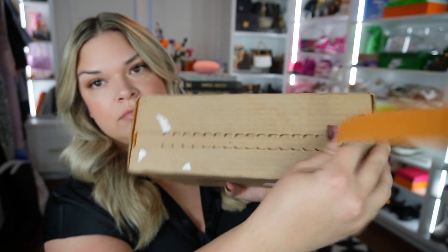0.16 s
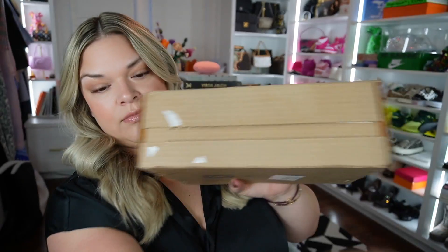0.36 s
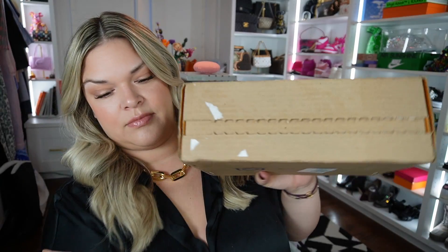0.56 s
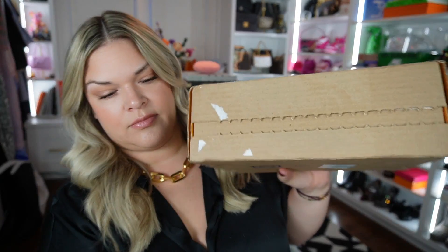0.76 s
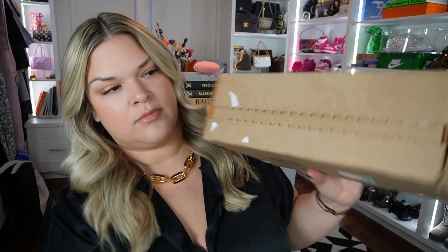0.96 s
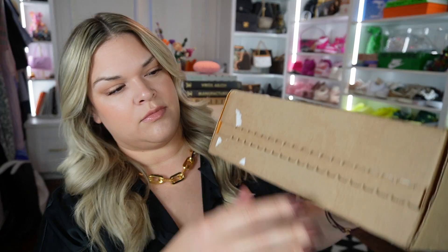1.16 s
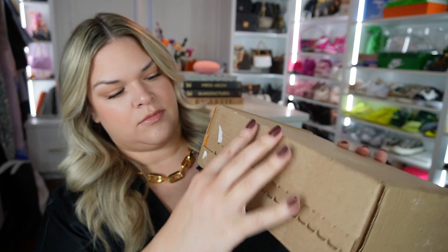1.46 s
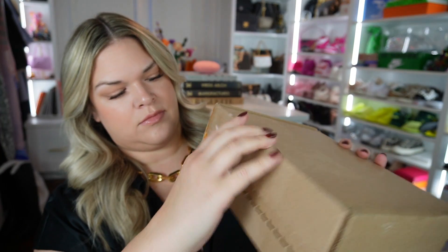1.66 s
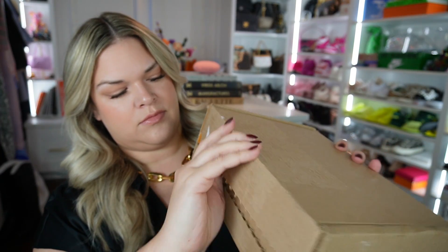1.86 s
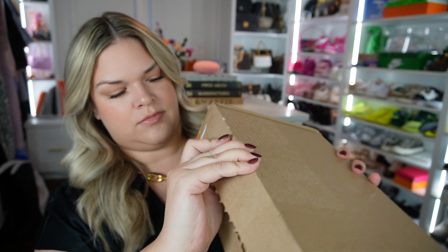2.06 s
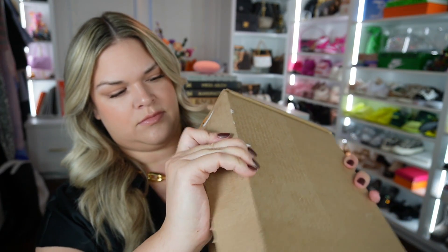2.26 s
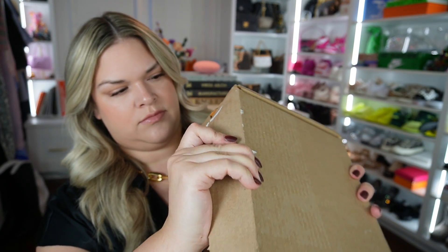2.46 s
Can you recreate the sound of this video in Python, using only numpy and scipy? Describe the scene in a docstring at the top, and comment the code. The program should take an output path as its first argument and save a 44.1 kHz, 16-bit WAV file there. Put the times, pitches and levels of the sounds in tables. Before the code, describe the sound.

A cardboard box's stuck strip rips off in a sharp burst, then fingers handle the flaps

```python
"""A cardboard box handled close to a microphone in a small soft room, over a faint mains hum and room air.
After two light knocks a stuck strip is ripped off in a loud burst of hiss, snaps and hollow knocks; small crackles
follow, then fingers slide, grip and pry at the flaps, with louder snaps and a knock near the end.
Rubbing and scuffs are grainy noise, snaps are noise bursts with a spike, knocks are rough pushes through box modes.
"""
import sys
import numpy as np
from scipy import signal
from scipy.fft import rfft, irfft, next_fast_len
from scipy.io import wavfile
from scipy.ndimage import uniform_filter1d, map_coordinates

SR = 44100
rng = np.random.default_rng(int(sys.argv[2]) if len(sys.argv) > 2 else 0)


def transcribe(u):
    """Save the signal u as a 16-bit wav file named by the first command-line argument.

    u: samples, shape (n,) or (channels, n), limited to [-1, 1]; the rate is SR.
    q: integer samples, one column per channel.
    """
    v = np.clip(np.atleast_2d(u).T, -1, 1)
    q = np.round(v * 32767).astype(np.int16)
    wavfile.write(sys.argv[1], SR, q)


N = 114660  # samples, 2.6 s


def amp(db):
    """Decibels to linear amplitude."""
    return 10 ** (np.asarray(db) / 20)


def unit(x):
    """Scale a signal to an rms of one."""
    return x / np.sqrt(np.mean(x ** 2) + 1e-20)


def along(points, hz):
    """Read a curve of (Hz, value) points on a log frequency axis."""
    f, v = np.transpose(points)
    return np.interp(np.log(hz + 1), np.log(f + 1), v)


def filtered(x, response):
    """Multiply the spectrum of x by a complex response of frequency."""
    m = next_fast_len(len(x) + 8192)  # room for the ringing
    spectrum = rfft(x, m) * response(np.fft.rfftfreq(m, 1 / SR))
    return irfft(spectrum, m)[:len(x)]


def wobble(rate):
    """A smooth random curve with rate knots a second."""
    knots = rng.standard_normal(int(N * rate / SR) + 4)
    return map_coordinates(knots, [np.arange(N) * rate / SR])


def broad(f, hz, width):
    """One wide causal resonance; width is its bandwidth as a share of the centre."""
    w = hz * max(width, .1)
    return 1j * f * w / (hz * hz - f * f + 1j * f * w)


def box(f, turn):
    """Causal modes of the hollow box: turn near -1 alternates their signs, near 1 starts them together."""
    # The hollow resonances of the box. Each row: centre in Hz, width in Hz, relative level in dB.
    modes = [(136, 37, -4.5), (228, 60, -1.5), (297, 77, 1), (355.4, 36, 4.5), (456, 69.6, 1.5),
             (628, 150, -2), (828, 110, -0.5), (1031, 110, -1.5), (1380, 280, -5), (1860, 360, -6.5),
             (2430, 700, -12)]
    response = 0
    for k, (centre, width, db) in enumerate(modes):
        mode = 1j * f * width / (centre * centre - f * f + 1j * f * width)
        response = response + turn ** k * amp(db) * mode
    return response


def friction():
    """Sliding fibres: steady noise mixed with tiny ticks of uneven size."""
    grains_per_s, grain_share = 2000, 0.4  # share of the power
    ticks = rng.exponential(size=N) * (rng.random(N) < grains_per_s / SR)
    envelope = np.sqrt(signal.lfilter([1], [1, -.9], ticks ** 2))  # each tick dies within samples
    grains = envelope * rng.standard_normal(N)
    smooth = rng.standard_normal(N)
    return np.sqrt(grain_share) * unit(grains) + np.sqrt(1 - grain_share) * smooth


def patchy(x):
    """Random gain patches over time and frequency: each bit of surface sounds a little different."""
    patch_db = 2.5  # rms
    z = signal.stft(x, nperseg=256)[2]
    field = uniform_filter1d(rng.standard_normal(z.shape), size=12, axis=0)
    field = uniform_filter1d(field, size=8, axis=1)
    return signal.istft(z * amp(patch_db * unit(field)), nperseg=256)[1][:N]


def background():
    """Room air is coloured noise; mains hum is a sine of slowly wandering level."""
    # The mains hum. Each row: frequency in Hz, mean level in dB rms.
    hum_tones = [(120, -70)]
    # The colour of the room air. Each row: frequency in Hz, relative level in dB.
    air_colour = [(25, -6), (80, -3), (160, -9), (260, -3), (500, -13.5), (1070, -17.5), (4000, -29),
                  (16000, -30.5)]
    air_db = -73.5  # rms
    t = np.arange(N) / SR
    hum = np.zeros(N)
    for hz, db in hum_tones:
        hum += np.sqrt(2) * amp(db + 0.99 * wobble(5)) * np.sin(2 * np.pi * hz * t)
    air = unit(filtered(rng.standard_normal(N), lambda f: amp(along(air_colour, f))))
    return hum + amp(air_db) * air


def room(x):
    """Soft walls answer with noise in which each frequency dies at its own speed."""
    # How long the room rings. Each row: frequency in Hz, t60 in seconds.
    decay = [(200, 0.14), (1500, 0.24), (12000, 0.32)]
    hz, t, z = signal.stft(rng.standard_normal(SR // 2), SR, nperseg=256)
    fade = amp(-60 * t / along(decay, hz)[:, None])
    tail = signal.istft(z * fade, SR, nperseg=256)[1]
    delayed = np.pad(x, (200, 0))  # samples before the answer
    return signal.fftconvolve(delayed, tail / np.linalg.norm(tail))[:N]


def scuffs():
    """Fingers scuff over the corrugation: resonant friction swells, flutters roughly and fades."""
    # The scuffs. Each row: start in seconds, time from start to fade in seconds, level in dB rms before the
    # flutter, centre in Hz, resonance width as a share of the centre, swell in seconds.
    scuff_list = [(0.17, .04, -51, 993, 0.44, 0.0062), (0.955, 0.075, -54.5, 835, 0.72, 0.0024),
                  (1.549, 0.11, -61, 1020, 0.23, 0.01), (1.687, 0.05, -53.5, 1037, 0.19, 0.02),
                  (1.784, 0.062, -52.5, 1060, 0.12, 0.0033), (1.94, 0.2, -59.5, 2090, 0.64, 0.028),
                  (2.411, .17, -48, 1480, 1.47, 0.16)]
    fade_s = 0.02  # time constant
    out, t = np.zeros(N), np.arange(N) / SR
    for start, length, db, hz, width, swell in scuff_list:
        rise = np.clip((t - start) / swell, 0, 1)
        fade = np.exp(-np.clip(t - start - length, 0, 1) / fade_s)
        # a weak second resonance sits an octave above
        band = unit(filtered(friction(), lambda f: broad(f, hz, width) ** 2 + 0.13 * broad(f, 2 * hz, 0.65)))
        out += amp(db + 3.9 * wobble(70)) * rise * fade * band
    return out


def rubbing():
    """Sliding and peeling contact hisses on the paper surface and drives the box into a rumble."""
    # The course of the rubbing. Each row: time in seconds, hiss level and box rumble level in dB rms
    # before their wobble.
    course = [(0.017, -43.5, -112), (0.044, -55, -53.5), (0.111, -59, -70), (0.169, -51, -54.5),
              (0.19, -37.5, -46.5), (0.209, -50, -40), (0.222, -40, -29.5), (0.231, -20, -22),
              (0.238, -33, -33), (0.248, -26.5, -26.5), (0.263, -39.5, -33.5), (0.285, -44, -43.5),
              (0.33, -54.5, -44.5), (0.369, -64.5, -59.5), (0.43, -59.5, -62), (0.486, -63, -61),
              (0.52, -54, -63), (0.56, -62, -60.5), (0.66, -66.5, -63.5), (0.76, -69.5, -73),
              (0.849, -58.5, -62.5), (0.98, -63, -69), (1.0, -54, -64), (1.09, -72.5, -58.5),
              (1.2, -85, -76), (1.35, -82.5, -70), (1.413, -76, -62), (1.422, -56, -63), (1.45, -57, -59),
              (1.465, -69, -64), (1.505, -65.5, -65.5), (1.517, -58.5, -64.5), (1.674, -60, -58.5),
              (1.712, -44.5, -44), (1.741, -61, -65), (1.779, -68, -65), (1.79, -54.5, -47),
              (1.87, -66, -52.5), (1.91, -59.5, -60), (2.03, -55, -58), (2.15, -57.5, -55.5),
              (2.24, -51.5, -52.5), (2.38, -66, -55.5), (2.5, -50.5, -51.5), (2.6, -49.5, -53)]
    # The colour of the paper hiss. Each row: frequency in Hz, relative level in dB per Hz.
    paper_colour = [(800, -40), (1500, -5.5), (2140, -7.5), (3410, -5.5), (5070, -7), (8570, -2),
                    (10300, -11.5), (13400, -14.5), (16000, -19)]
    s, hiss_db, rumble_db = np.transpose(course)
    t = np.arange(N) / SR
    hiss = unit(filtered(patchy(friction()), lambda f: amp(along(paper_colour, f))))
    rumble = unit(filtered(friction(), lambda f: box(f, -0.99)))
    hiss_gain = amp(np.interp(t, s, hiss_db) + 1.5 * wobble(60))
    rumble_gain = amp(np.interp(t, s, rumble_db) + 0.32 * wobble(33))
    touching = t > s[0]
    return touching * (hiss * hiss_gain + rumble * rumble_gain)


def knocks():
    """A short rough push rings the box modes near its centre and jolts the whole box."""
    # Knocks into the box walls. Each row: start in seconds, peak of the ring in dB, centre of the excited
    # modes in Hz, contact time constant in seconds, jolt of the whole box in dB relative to the ring peak.
    knock_list = [(0.017, -34, 360, 0.0026, -6.5), (0.026, -30.5, 370, 0.0047, -12),
                  (0.2095, -15, 488, 0.00067, -21), (0.2149, -10, 264, 0.0044, -23),
                  (0.23, -20, 382, 0.0016, -14), (0.2471, -16, 320, 0.0021, -29),
                  (0.267, -30, 231, 0.0031, -30), (0.311, -28.5, 490, 0.0035, -18),
                  (0.9546, -39.5, 770, 0.0086, -12.5), (1.004, -39.5, 790, 0.0055, -28),
                  (1.053, -46.5, 348, 0.0026, -12.5), (1.3789, -41.5, 341, 0.0037, -20),
                  (1.4144, -42, 353, 0.004, -27), (1.7117, -31, 398, 0.0036, -12),
                  (1.784, -40, 356, 0.0018, -35), (1.995, -50.5, 237, 0.029, -7),
                  (2.159, -31, 880, 0.0075, -27), (2.224, -43, 293, 0.0042, -27),
                  (2.299, -19.5, 766, 0.0099, -15.5), (2.304, -25, 484, 0.005, -23.5),
                  (2.542, -32.5, 350, 0.0017, -37)]
    press_s = .002  # the wall yields this long before the blow
    blow_db = 7.5  # boost of the first blow over the rough contact
    thud_hz, thud_t60 = 115, 0.031  # Hz, s
    width = 0.98  # share of the centre
    out, t = np.zeros(N + SR), np.arange(SR // 5) / SR
    for start, db, hz, contact, thud_db in knock_list:
        envelope = np.minimum(t / press_s, 1) ** 2 * np.exp(-t / max(contact, .0003))
        push = rng.standard_normal(len(t)) * envelope
        push[round(press_s * SR)] = amp(blow_db) * np.sqrt(contact * SR / 20)  # longer contact, bigger blow
        ring = filtered(push, lambda f: box(f, 0.98) * broad(f, hz, width) / (1 + 1j * f / (2 * hz)))
        thud = amp(thud_db - 60 * t / thud_t60) * np.sin(2 * np.pi * thud_hz * t)
        out[round(start * SR):][:len(t)] += amp(db) * (ring / np.abs(ring).max() + thud)
    return out[:N]


def snaps():
    """Fibre or glue swells under strain, breaks with a spike and dies as crackle in milliseconds."""
    # Snaps of fibre and glue. Each row: start in seconds, peak in dB, centre in Hz, decay t60 in seconds.
    snap_list = [(0.0307, -12.5, 3407, 0.0052), (0.1491, -37, 3745, 0.0066), (0.1703, -28.5, 4200, 0.01),
                 (0.1945, -25.5, 3733, 0.015), (0.2021, -19, 8320, 0.012), (0.2093, -8.5, 3890, 0.025),
                 (0.2303, -8, 2735, 0.012), (0.2478, -10, 7000, 0.014), (0.2559, -25.5, 7910, 0.012),
                 (0.2636, -20.5, 8120, 0.0087), (0.2905, -29, 7820, 0.011), (0.3136, -33.5, 2795, 0.019),
                 (0.414, -37.5, 5900, 0.011), (0.4398, -37, 5200, 0.014), (0.4613, -37.5, 5140, 0.0097),
                 (0.5144, -39, 5160, 0.016), (0.6291, -41, 3660, 0.021), (0.8325, -35.5, 5300, 0.018),
                 (0.85, -39, 7100, 0.046), (0.9877, -38.5, 5470, 0.018), (0.9955, -37, 7350, 0.018),
                 (1.031, -47.5, 6880, 0.015), (1.0694, -46.5, 7740, 0.016), (1.482, -51, 2640, 0.018),
                 (1.5092, -38.5, 7500, 0.01), (1.645, -34.5, 12500, 0.014), (1.7045, -35, 5100, 0.012),
                 (1.7123, -32.5, 12300, 0.016), (1.8084, -41, 4430, 0.023), (1.9937, -36, 7780, 0.014),
                 (2.1028, -33, 8900, 0.014), (2.1322, -38.5, 7980, 0.01), (2.1609, -22, 5760, 0.014),
                 (2.241, -34, 7700, 0.01), (2.2686, -31.5, 7300, 0.01), (2.2768, -33, 4500, 0.014),
                 (2.2993, -15.5, 6500, 0.02), (2.3025, -23.5, 8110, 0.04), (2.4184, -46, 11000, 0.01),
                 (2.516, -33, 8360, 0.017), (2.5454, -24, 2593, 0.023)]
    build_s = .0012  # swell before the break
    break_db = 12.5  # the single spike of the break over the crackle
    base_width, wider_db_per_db = 1.1, 0.53  # share of the centre at -27 dB; louder snaps are wider
    treble_hz = 10500  # treble roll-off
    out, t = np.zeros(N + SR), np.arange(SR // 10) / SR
    for start, db, hz, t60 in snap_list:
        swell = .3 * (t / build_s) ** 2
        crackle = amp(-60 * (t - build_s) / max(t60, .002))
        force = rng.standard_normal(len(t)) * np.where(t < build_s, swell, crackle)
        force[round(build_s * SR)] = amp(break_db)
        width = base_width * amp(wider_db_per_db * (db + 27))
        burst = filtered(force, lambda f: broad(f, hz, width) / (1 + 1j * (f / treble_hz) ** 2))
        out[round(start * SR):][:len(t)] += amp(db) * burst / np.abs(burst).max()
    return out[:N]


def scene():
    """Only the snaps and knocks excite the room; the other layers stay dry."""
    room_db = -9.5
    near = snaps() + knocks()
    mix = near + amp(room_db) * room(near) + rubbing() + scuffs() + background()
    return mix[None]


def record(dry):
    """Nothing is kept above the band limit."""
    top_hz = 15900
    return filtered(dry[0], lambda hz: hz < top_hz)[None]


dry = scene()
out = record(dry)
transcribe(out)
```